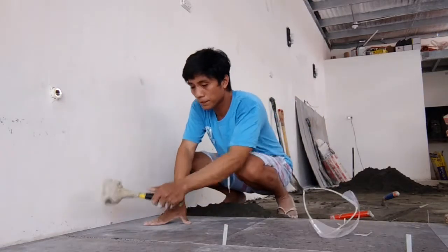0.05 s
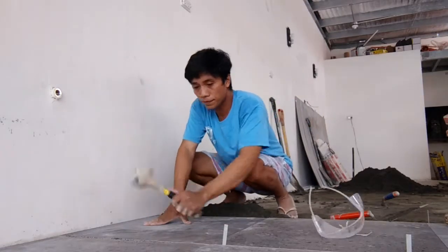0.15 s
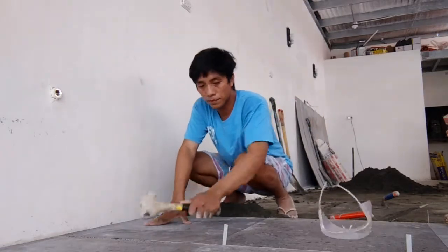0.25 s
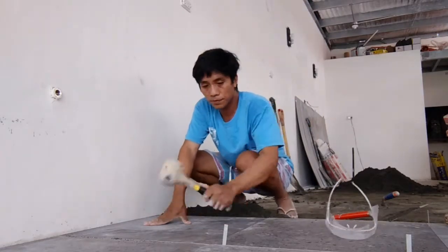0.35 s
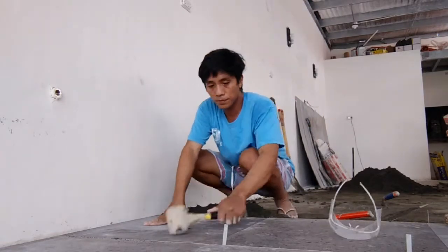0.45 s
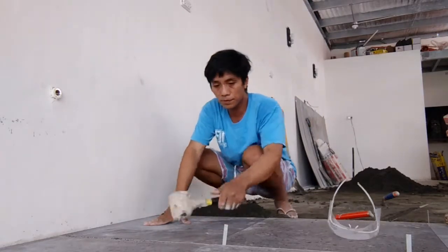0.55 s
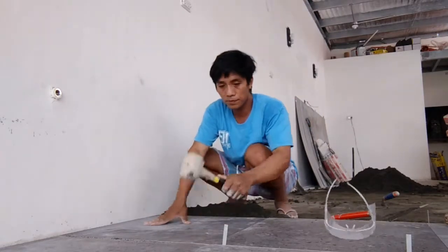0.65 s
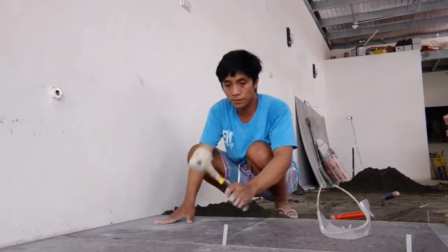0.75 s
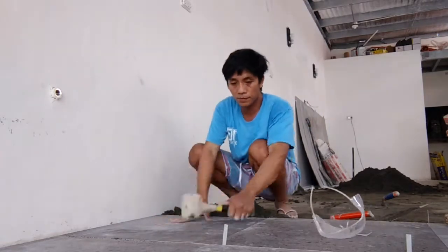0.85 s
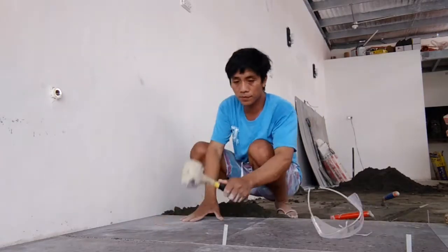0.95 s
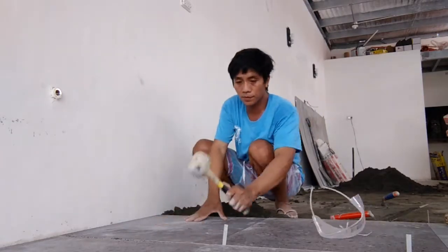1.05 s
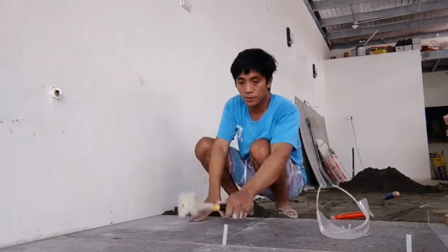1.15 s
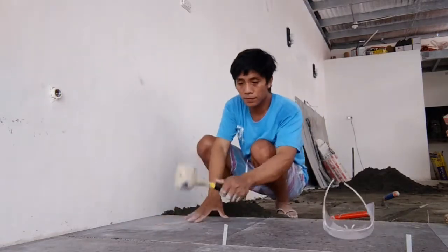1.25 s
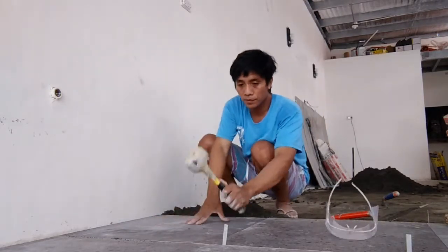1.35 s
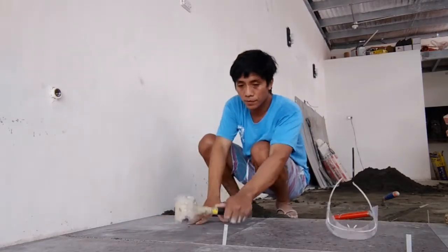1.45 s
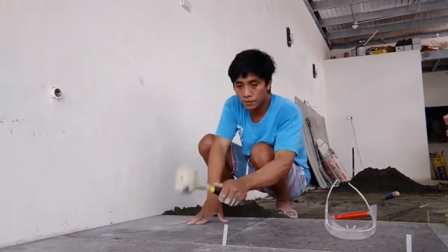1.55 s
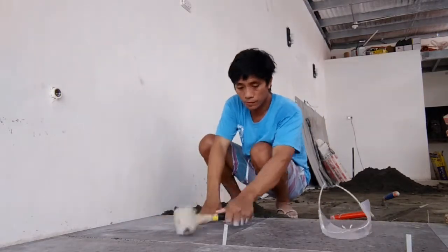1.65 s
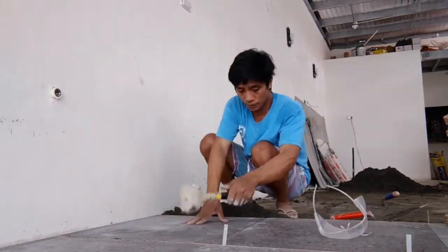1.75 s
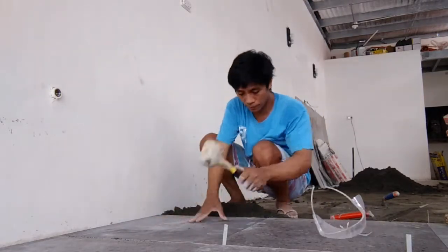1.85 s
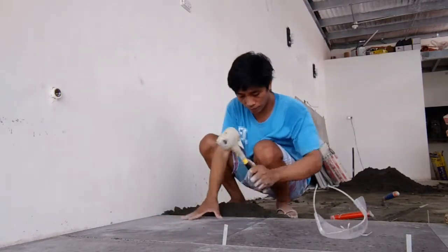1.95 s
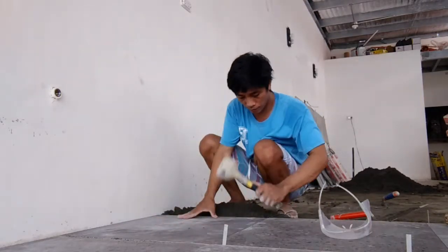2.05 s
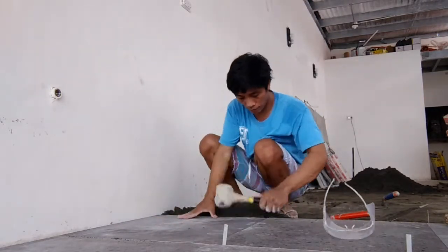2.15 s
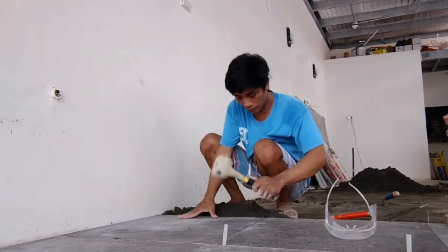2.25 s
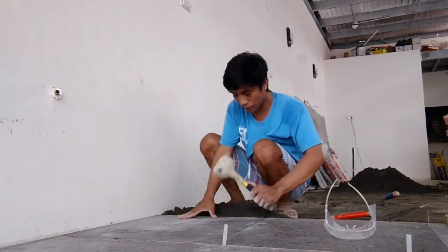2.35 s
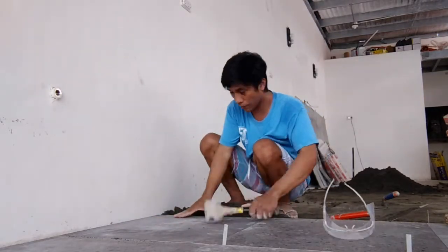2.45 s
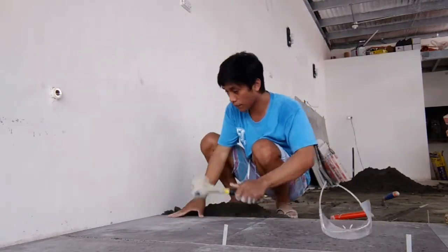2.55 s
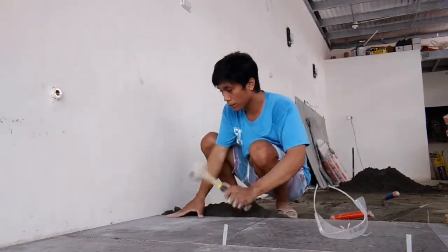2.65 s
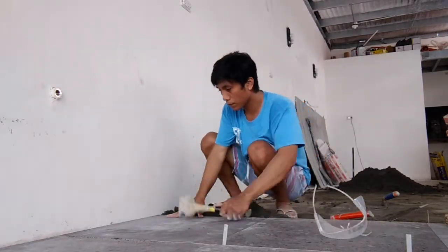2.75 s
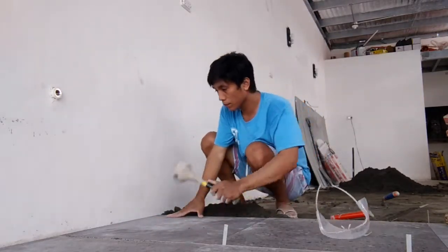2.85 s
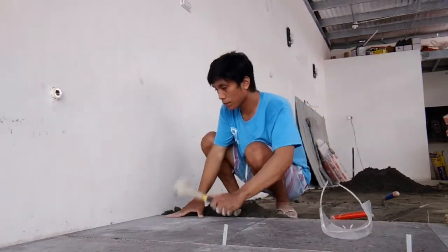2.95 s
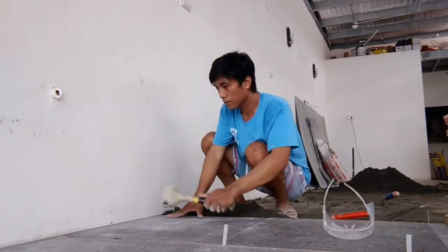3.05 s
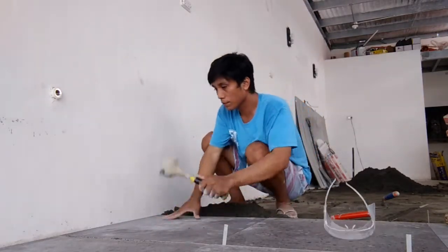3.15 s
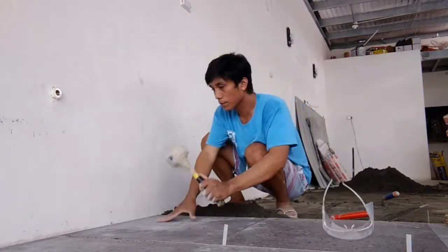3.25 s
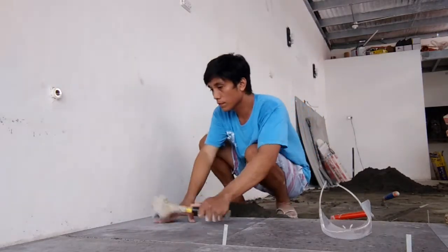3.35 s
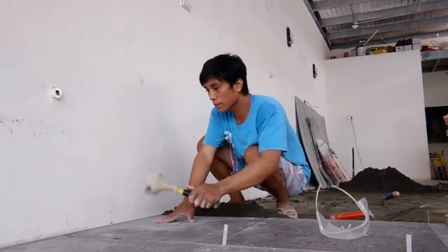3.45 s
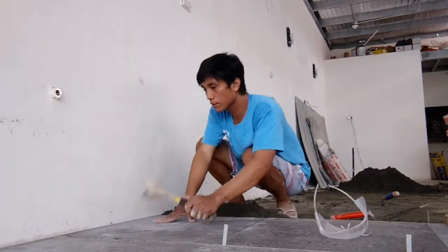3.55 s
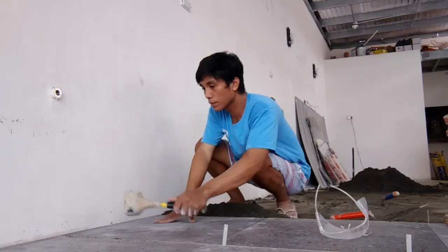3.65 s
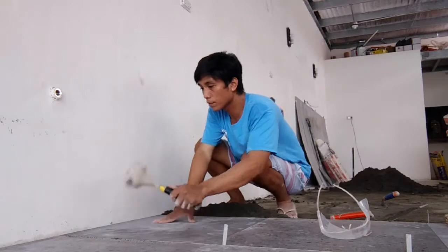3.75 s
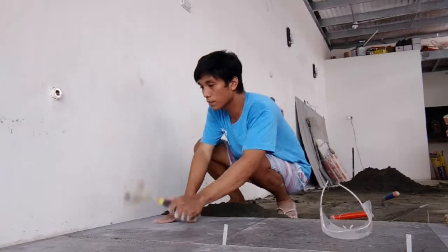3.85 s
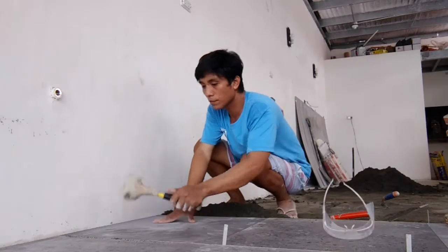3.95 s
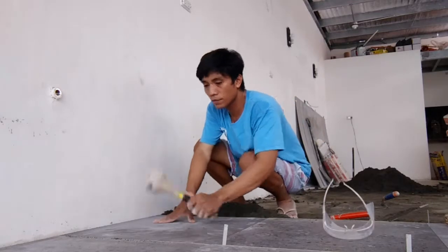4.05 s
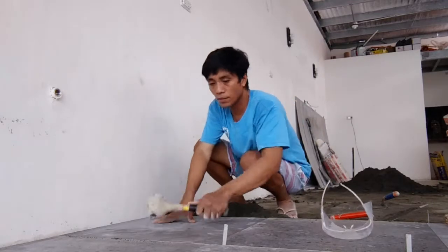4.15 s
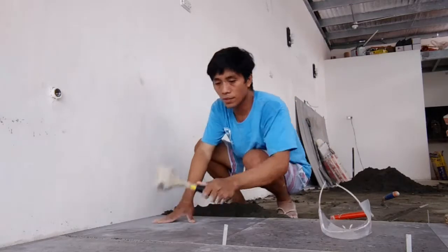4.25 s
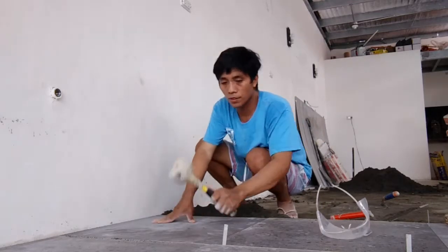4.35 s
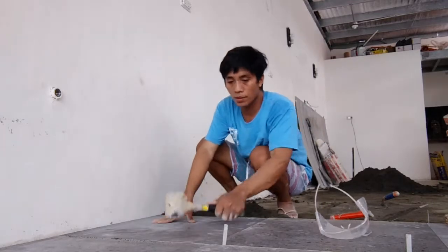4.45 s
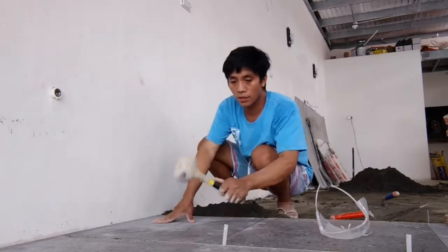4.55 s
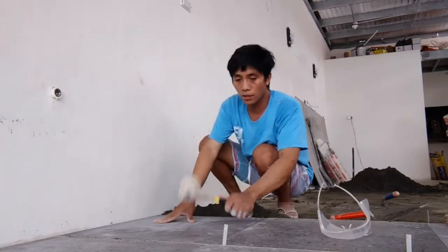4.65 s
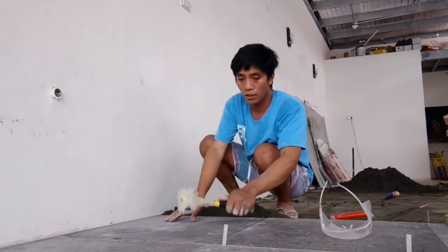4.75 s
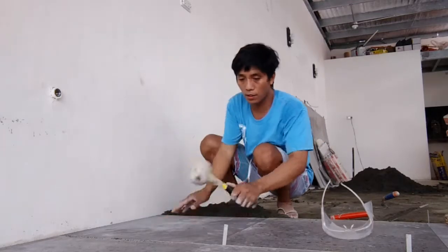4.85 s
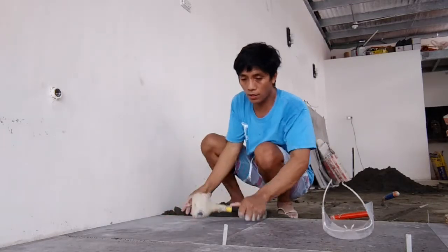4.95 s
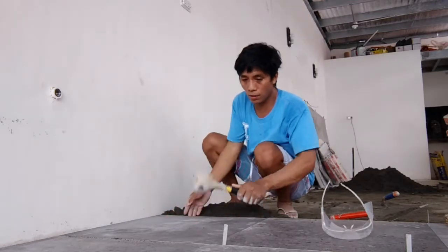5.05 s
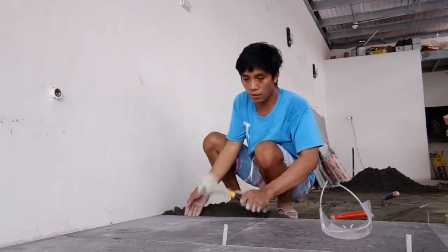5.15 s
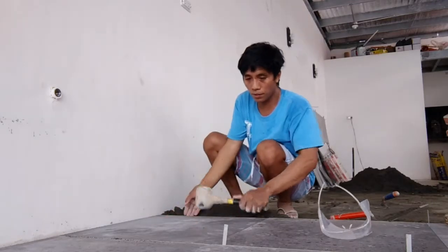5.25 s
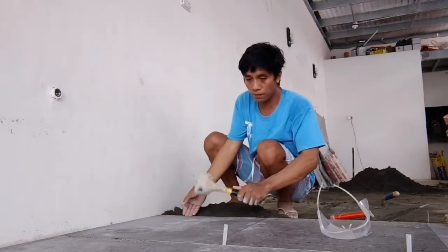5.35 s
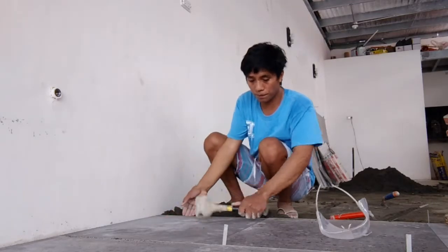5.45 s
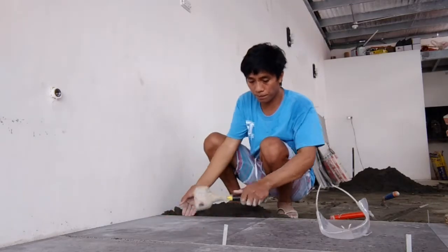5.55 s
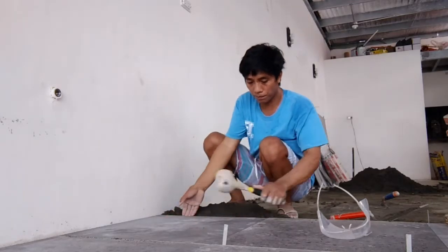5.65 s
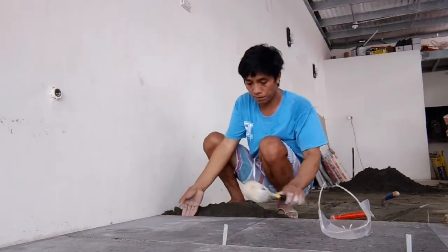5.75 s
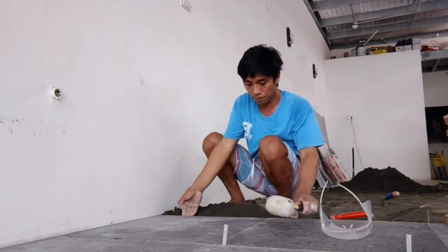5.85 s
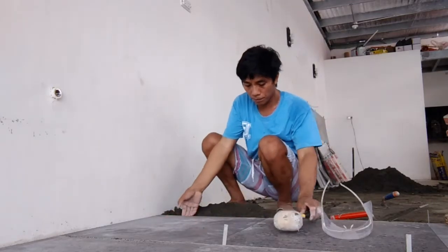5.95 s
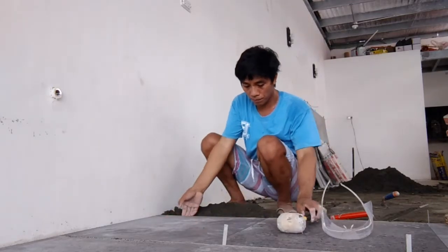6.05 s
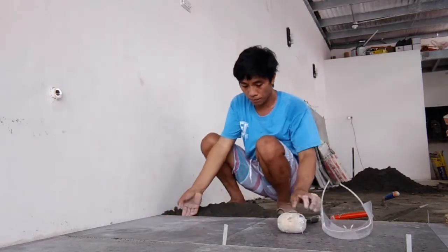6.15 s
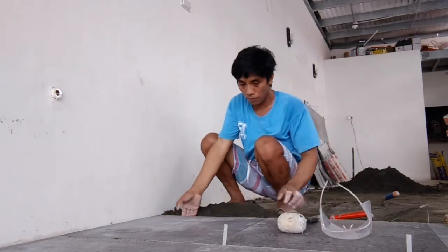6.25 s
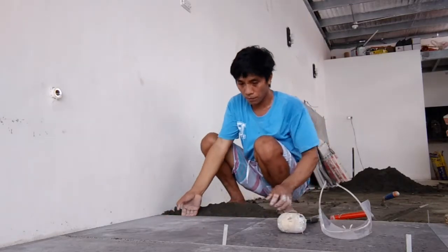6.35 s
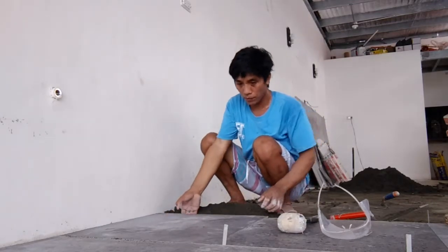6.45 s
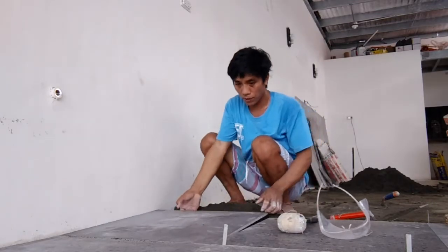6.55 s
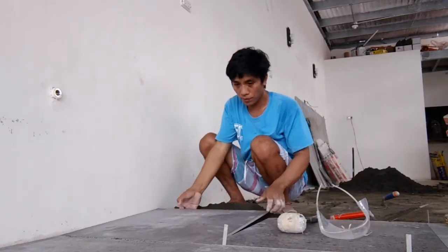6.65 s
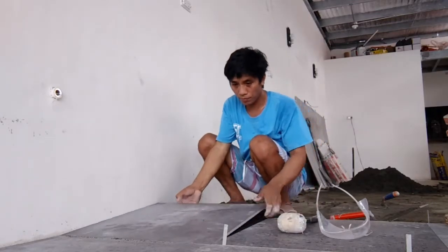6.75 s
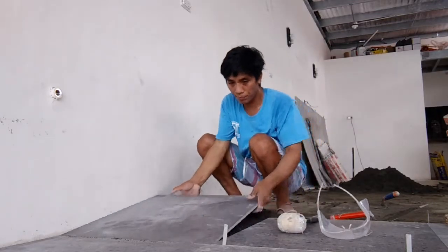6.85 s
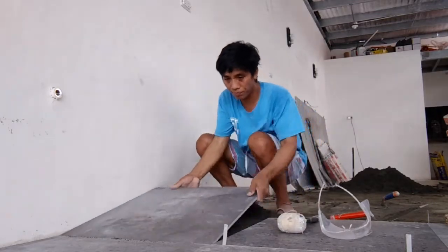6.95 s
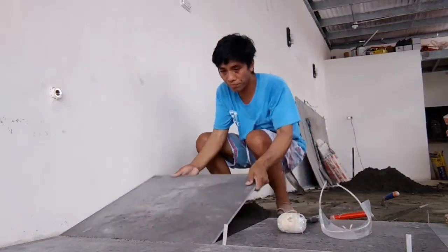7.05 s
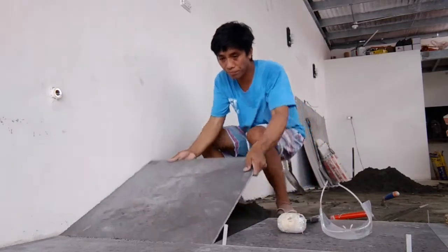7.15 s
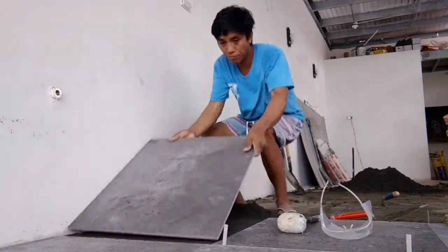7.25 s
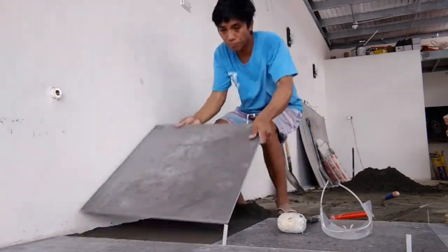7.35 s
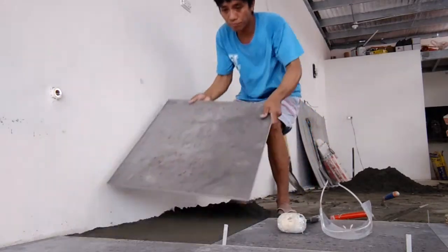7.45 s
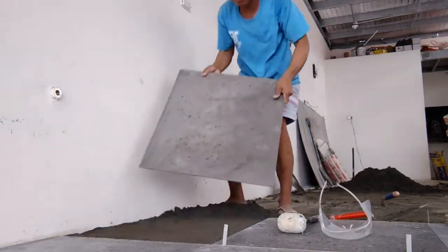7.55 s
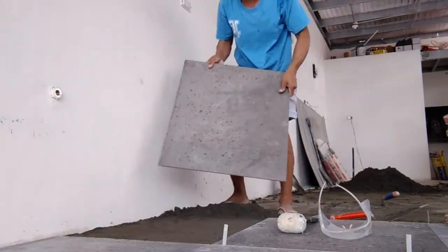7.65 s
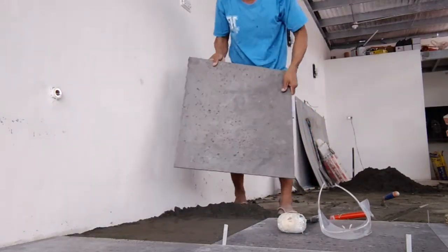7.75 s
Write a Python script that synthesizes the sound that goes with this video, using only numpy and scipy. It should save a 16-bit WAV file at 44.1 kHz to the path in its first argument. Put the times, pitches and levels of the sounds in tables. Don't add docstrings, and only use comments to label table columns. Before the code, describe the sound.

Quick, loud rubbery thuds on a damp tile boom through a bare hall over low traffic rumble, ending with small taps and a gritty scrape.

```python
import sys
import numpy as np
from scipy import signal
from scipy.io import wavfile

SR = 44100
rng = np.random.default_rng(int(sys.argv[2]) if len(sys.argv) > 2 else 0)


def undo_db(level):
    steps = np.asarray(level, float) / 20
    return 10 ** steps


def dump(signal):
    limited = np.clip(np.atleast_2d(signal).T, -1, 1)
    pcm = np.round(limited * 32767).astype(np.int16)
    wavfile.write(sys.argv[1], SR, pcm)


N = 343230


def rms_one(x):
    return x / np.sqrt(np.mean(x ** 2) + 1e-20)


def at_hz(points, hz):
    table_hz, *columns = np.transpose(points)
    return [np.interp(np.log(hz), np.log(table_hz), column) for column in columns]


def clicks(seconds, sizes):
    train = np.full(N, 1e-18)
    train[(np.asarray(seconds) * SR).astype(int)] = sizes
    return train


def ring(push, hz, t60):
    r = undo_db(-60 / (t60 * SR))
    w = 2 * np.pi * hz / SR
    return signal.lfilter([0, np.sin(w)], [1, -2 * r * np.cos(w), r * r], push)


def resonate(x, hz, width):
    r = np.exp(-np.pi * width / SR)
    feedback = [1, -2 * r * np.cos(2 * np.pi * hz / SR), r * r]
    return signal.lfilter([(1 - r * r) / 2, 0, (r * r - 1) / 2], feedback, x)


def resonant_tone(x, hz, width):
    return rms_one(resonate(resonate(x, hz, width), hz, 3 * width))


def drift(rate):
    count = int(N / SR * rate) + 3
    return np.interp(np.arange(N) / SR * rate, np.arange(count), rng.standard_normal(count))


def bands(size, low_hz, top_hz):
    white = rng.standard_normal((2, size))
    edges = low_hz * 2 ** np.arange(0, np.log2(top_hz / low_hz), 1 / 3)
    for k, (low, high) in enumerate(zip(edges, edges[1:])):
        sos = signal.butter(2, [low, high], "band", fs=SR, output="sos")
        yield np.sqrt(low * high), high - low, rms_one(signal.sosfilt(sos, white[k % 2]))


def coloured(spectrum, patchy_db):
    total = 0
    for hz, width, noise in bands(N, spectrum[0][0] * .8, min(spectrum[-1][0] * 1.3, .45 * SR)):
        level_db = at_hz(spectrum, hz)[0] + patchy_db * drift(11)
        total = total + undo_db(level_db) * np.sqrt(width) * noise
    return rms_one(total)


# start_s, level_db
TRAFFIC = [(0.0, -30), (0.13, -45), (0.76, -39), (1.2, -41), (2.2, -42.5), (3.4, -41.5), (4.5, -35.5),
           (5.3, -33), (6.0, -32), (7.1, -34), (7.78, -37.5)]
# pitch_hz, level_db (per Hz)
RUMBLE_COLOUR = [(15, -50), (25, -28), (45, -2.5), (129, 3.5), (170, -5), (270, -1.5), (327, -7.5),
                 (546, -5), (595, -11), (1500, -40.5), (1950, -49), (3300, -120)]
# pitch_hz, level_db (per Hz)
HISS_COLOUR = [(700, 3), (1000, 2.5), (2000, -5), (2500, -9), (4000, -17.5), (5000, -37.5), (6300, -73.5),
               (8000, -33.5), (10500, -36.5), (11500, -50), (14300, -46), (16000, -45.5)]
# pitch_hz, width_hz, level_db (over the rumble)
MOTOR_TONES = [(143.6, 5.9, -11.5), (206.6, 40, -13), (618.4, 11, -18.5), (708, 16, -16.5)]


def outdoors():
    mean_traffic_db, hiss_mean_db, hiss_follows = -38.5, -44.5, 0.78
    start_s, level_db = np.transpose(TRAFFIC)
    rumble_db = np.interp(np.arange(N) / SR, start_s, level_db)
    hiss_db = hiss_mean_db + hiss_follows * (rumble_db - mean_traffic_db)
    air = rng.standard_normal(N)
    motor = 0
    for hz, width, db in MOTOR_TONES:
        motor = motor + undo_db(db) * rms_one(resonate(resonate(air, hz, width), hz, width))
    rumble = coloured(RUMBLE_COLOUR, patchy_db=3.0) + motor
    return undo_db(rumble_db) * rumble + undo_db(hiss_db) * coloured(HISS_COLOUR, patchy_db=1.0)


def breeze():
    sos = signal.butter(2, [40, 70], "band", fs=SR, output="sos")
    air = signal.sosfilt(sos, rng.standard_normal(N))
    return undo_db(-48 + 2.0 * drift(6)) * rms_one(air)


SLAP_FROM_HZ = 950
# pitch_hz, level_db, t60_s
TILE_MODES = [(196.4, 1.5, 0.19), (442, 4, 0.033), (600, 3, 0.021), (827, -4.5, 0.046),
              (1021, -10.5, 0.056), (1200, -15, 0.041), (1418.5, -4.5, 0.048), (1882, -9.5, 0.063),
              (2200, -6, 0.01), (2420, -18, 0.05), (2910, -26.5, 0.06), (3600, -31, 0.034)]


def tile(strength_db, thud_db, slap_db):
    thud_lag_s, scatter_s, detune, luck_db, max_t60_s = 0.0017, .001, .025, 2.5, .05
    blur = 0.16
    t = np.arange(SR // 12) / SR
    near, blurred = 0, 0
    chances = rng.standard_normal((len(TILE_MODES), 3))
    for k, ((hz, level_db, t60), (luck, lag, shift)) in enumerate(zip(TILE_MODES, chances)):
        if k == 0:
            mode_db = strength_db + level_db + thud_db
            smooth_db, delay_s, sign = mode_db, thud_lag_s, 1
        else:
            mode_db = strength_db + level_db + slap_db * (hz > SLAP_FROM_HZ) + luck_db * luck
            smooth_db, delay_s, sign = mode_db - luck_db * luck / 2, scatter_s * abs(lag) / 2, -1
        since = np.clip(t - delay_s, 0, None)
        wave = sign * np.sin(2 * np.pi * hz * (1 + detune * shift) * since)
        near = near + wave * undo_db(mode_db) * undo_db(-60 * since / min(t60, max_t60_s))
        blurred = blurred + undo_db(smooth_db - 60 * t / (t60 * blur)) * np.sin(2 * np.pi * hz * t)
    return near, blurred


def crack(s, level_db):
    length_s = 0.0039
    t = np.arange(int(length_s * 3 * SR)) / SR / length_s
    shape = np.convolve(clicks(s, undo_db(level_db)), t * np.exp(-t ** 2))[:N]
    return shape * signal.lfilter(*signal.butter(1, [4000, 11000], "band", fs=SR), rng.standard_normal(N))


def snap(s, level_db):
    burst = np.hanning(int(.007 * SR))
    shape = np.convolve(clicks(s, undo_db(level_db)), burst / np.linalg.norm(burst))[:N]
    noise = shape * rng.standard_normal(N)
    return signal.lfilter(*signal.butter(1, [2800, 6500], "band", fs=SR), noise)


# pitch_hz, level_db, t60_s
HALL_BOOM = [(57.4, -27, 0.2), (89, -22, 1), (111.8, -16, 0.93), (141, -9.5, 0.69), (178.9, -13, 1),
             (180.7, -10.5, 0.53), (189.95, -4, 0.83), (232.6, -10, 0.37), (258.6, -15.5, 0.16),
             (292.4, -25, 0.88), (311.8, -13, 0.35), (344.8, -15.5, 0.99), (461.5, -12.5, 0.52),
             (678.6, -13.5, 0.47)]


def hall_boom(s, drive_db):
    spread_db, delay_s = 2.0, 0.00306
    boom = 0
    for hz, level_db, t60 in HALL_BOOM:
        push_db = level_db + drive_db + spread_db * rng.standard_normal(len(s))
        boom = boom + ring(clicks(s + delay_s, undo_db(push_db)), hz, t60)
    return signal.sosfilt(signal.butter(4, 80, "high", fs=SR, output="sos"), boom)


# pitch_hz, level_db, t60_s, build_up_s
HALL_ECHOES = [(250, -28.5, 0.54, 0.017), (370, -23, 0.45, 0.049), (816, -28.5, 0.36, 0.038),
               (1200, -33, 0.39, 0.034), (2210, -33, 0.42, 0.03), (4280, -23, 0.43, 0.035),
               (7800, -38.5, 0.29, 0.035)]


def echoes():
    early_share = 0.24
    t = np.arange(SR) / SR
    path = 0
    for hz, width, noise in bands(SR, 220, 14000):
        level_db, t60, build = at_hz(HALL_ECHOES, hz)
        growth = 1 - (1 - early_share * (t > .004)) * np.exp(-(t / build) ** 2)
        path = path + noise * np.sqrt(width / 1000) * undo_db(level_db - 60 * t / t60) * growth
    return path


# start_s, tile_ring_db, hall_db, grit_db (under the head), spot (place on the tile, 0-1)
MALLET_BLOWS = [(0.053, -5.5, -7, 1.5, 0.6), (0.313, -7.5, -3.5, 0.5, 0.27), (0.56, -7, -5.5, -1.5, 0.83),
                (0.932, -7, -3, -3, 0.62), (1.223, -5.5, -4, 4, 0), (1.532, -8.5, -2.5, 3, 0.29),
                (1.793, -6, -3, 5, 0.3), (2.248, -5, -8.5, -3, 0.01), (2.524, -10, -3.5, 2, 1),
                (2.814, -8, -7, 1.5, 0.6), (3.086, -7.5, -6.5, 3, 0.13), (3.439, -8.5, -4.5, 2.5, 0.06),
                (3.689, -8, -3.5, 4.5, 0.27), (3.955, -5.5, -5.5, 0, 0.46), (4.2, -8.5, -2.5, -2, 1),
                (4.512, -9, -3, 0, 0.18), (4.788, -10, -2.5, -2, 0.52), (5.058, -6.5, -7, 2, 0.46),
                (5.329, -7.5, -8, -1.5, 0.08), (5.575, -13.5, -4, -3.5, 0.29)]


def mallet():
    s, blow_db, hall_db, grit_db, spot = np.transpose(MALLET_BLOWS)
    thud_db = -3.1 - 0.52 * blow_db
    slap_db = -5 - 0.71 * blow_db
    squash_s = .0005
    knocks = np.zeros((2, N))
    for start, *levels_db in zip(s, blow_db, thud_db, slap_db):
        waves = np.array(tile(*levels_db))
        at = int((start + squash_s) * SR)
        knocks[:, at:at + waves.shape[1]] += waves
    soft = signal.butter(4, 2186, fs=SR, output="sos")
    edge = signal.butter(2, 134, "high", fs=SR, output="sos")
    near, blurred = signal.sosfilt(np.vstack([soft, edge]), knocks + 1e-18)
    grit = crack(s, -35 + grit_db)
    boom = hall_boom(s, blow_db + thud_db + hall_db)

    upper_ring = signal.lfilter(*signal.butter(2, SLAP_FROM_HZ, "high", fs=SR), near)
    sent = 0.94 * blurred + 0.31 * upper_ring + snap(s, blow_db + slap_db - 13)
    which = np.clip(np.searchsorted(s * SR, np.arange(N)) - 1, 0, None)
    sent = sent * undo_db(hall_db[which])
    turn = spot[which] * np.pi / 2
    wet = signal.fftconvolve(sent * np.cos(turn), echoes())
    wet = wet + signal.fftconvolve(sent * np.sin(turn), echoes())
    return near + grit + boom + wet[:N]


# start_s, length_s, pitch_hz, width_hz, level_db
SOLE_SQUEAKS = [(0.256, 0.053, 2600, 1490, -51), (1.078, 0.092, 2506, 30.2, -52),
                (2.12, 0.22, 1300, 25, -55), (2.44, 0.059, 1200, 25, -48), (5.17, 0.03, 3740, 70, -46.5),
                (5.207, 0.11, 3690, 90, -51), (6.682, 0.3, 736, 250, -44), (6.8, .16, 580, 40, -40)]
# start_s, end_s, pitch_hz, width_hz, throbs_per_s, level_db
CRICKET_SONG = (5.2, 7.3, 14300, 200, 30, -83)


def squeaks():
    t = np.arange(N) / SR
    air = rng.standard_normal(N)

    def swell(start, length):
        return np.sin(np.pi * np.clip((t - start) / length, 0, 1)) ** .5

    start, end, hz, width, rate, db = CRICKET_SONG
    throbs = np.clip(drift(rate) + .5, 0, None)
    out = undo_db(db) * swell(start, end - start) * throbs * resonant_tone(air, hz, width)
    for start, length, hz, width, db in SOLE_SQUEAKS:
        out = out + undo_db(db) * swell(start, length) * resonant_tone(air, hz, width)
    return out


def stroke_db(start, swell, hold, release, db):
    t = np.arange(N) / SR - start
    rise = np.clip(t / swell, 0, 1)
    fall = np.clip((t - swell - hold) / release, 0, None)
    return db - 25 * (1 - rise) ** 2 - 33 * fall - 100 * (t < 0)


def scrape(stroke, body, per_s, wash_db):
    at = slice(int((stroke[0] - .05) * SR), int((stroke[0] + .45) * SR))
    grit = (rng.random(N) < per_s / SR) * rng.standard_normal(N) + 1e-18
    grit = grit[at]
    rings = 0
    for hz, width, db in body:
        wash = resonant_tone(grit, hz, hz * 0.067)
        rings = rings + undo_db(db) * (resonant_tone(grit, hz, width) + undo_db(wash_db) * wash)
    out = np.zeros(N)
    out[at] = undo_db(stroke_db(*stroke)[at]) * rms_one(rings)
    return out


# start_s, swell_s, hold_s, release_s, level_db
SHOVEL_STROKE = (.68, .16, .065, .025, -40)
# pitch_hz, width_hz, level_db
SHOVEL_METAL = [(1020, 60, -8), (1500, 60, -8), (1780, 70, 0), (2230, 80, -3), (3140, 90, -9),
                (3460, 70, -8), (3830, 60, -14), (4600, 90, -17), (4820, 60, -13), (5600, 110, -21),
                (6160, 60, -19), (6910, 70, -23), (8000, 60, -24), (8260, 70, -22), (8630, 60, -22),
                (9480, 70, -27), (10200, 80, -26), (11400, 60, -31), (12800, 80, -35)]


def shovel():
    return scrape(SHOVEL_STROKE, SHOVEL_METAL, per_s=4200, wash_db=-2)


def small_hits(rows, spread, count):
    out = np.zeros(N)
    ratios = np.exp(spread * rng.standard_normal((len(rows), count)))
    push = signal.unit_impulse(SR // 10)
    for (s, db, hz, t60), row in zip(rows, ratios):
        at = int(s * SR)
        cluster = sum(ring(push, min(hz * ratio, 10800), t60) for ratio in row)
        out[at:at + len(push)] += undo_db(db - 14.5) * cluster
    return out


# start_s, peak_db, pitch_hz, t60_s
GRIT_TICKS = [(1.723, -52, 7000, .012), (1.762, -56, 7000, 0.01), (1.907, -58, 8200, 0.0048),
              (3.189, -49, 6800, 0.0099), (4.1, -53, 5200, .02), (4.161, -56, 5100, 0.04),
              (4.365, -56.5, 8450, 0.0077), (5.0, -56.5, 5900, .015), (6.101, -47.5, 8500, 0.018),
              (6.167, -51.5, 8600, 0.013), (6.224, -55, 9000, .012)]


def ticks():
    return small_hits(GRIT_TICKS, spread=0.24, count=24)


# start_s, peak_db, pitch_hz, t60_s
EDGE_TAPS = [(5.882, -31, 1000, 0.014), (6.051, -34, 990, 0.015), (6.223, -22, 1032, 0.051),
             (6.688, -30.5, 900, 0.02), (6.717, -30, 600, 0.02)]


def taps():
    return signal.lfilter(*signal.butter(2, 2400, fs=SR), small_hits(EDGE_TAPS, spread=0.43, count=24))


# start_s, swell_s, hold_s, release_s, level_db
LIFT_STROKE = (7.278, .01, .03, .12, -29.5)
# pitch_hz, width_hz, level_db
LIFTED_TILE = [(1130, 80, -7), (1530, 40, -1), (1880, 40, -3), (2100, 60, 0), (2480, 60, -3),
               (2700, 50, -10), (3400, 120, -17), (4300, 100, -21), (4890, 60, -24), (5410, 50, -25),
               (6500, 60, -31), (7490, 70, -29), (8400, 90, -30), (9650, 60, -28), (10700, 50, -29),
               (11400, 60, -32), (13500, 60, -35), (14100, 60, -34)]


def lift():
    return scrape(LIFT_STROKE, LIFTED_TILE, per_s=9000, wash_db=0)


def scene():
    background = outdoors() + breeze()
    work = mallet() + squeaks() + shovel() + ticks() + taps() + lift()
    return (background + work)[None]


def top_cut(x):
    return signal.sosfilt(signal.butter(12, 15600, fs=SR, output="sos"), x)


def record(dry):
    overload, knee, top_hz = .73, 9.0, 15600
    x = signal.sosfilt(signal.butter(2, 45, "high", fs=SR, output="sos"), dry)
    x = x / (1 + np.abs(x / overload) ** knee) ** (1 / knee)
    x = signal.lfilter(*signal.butter(1, 14, "high", fs=SR), x)
    x = signal.sosfilt(signal.cheby2(8, 30, top_hz * 1.03, fs=SR, output="sos"), x)
    return top_cut(x)


dry = scene()
out = record(dry)
dump(out)
```